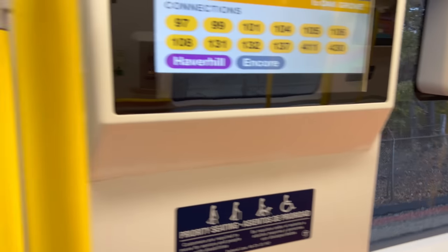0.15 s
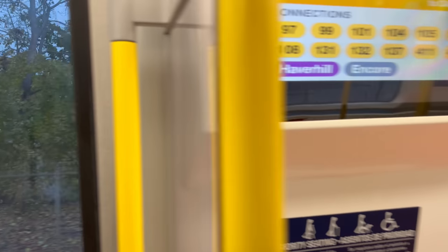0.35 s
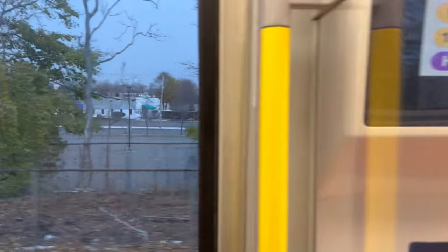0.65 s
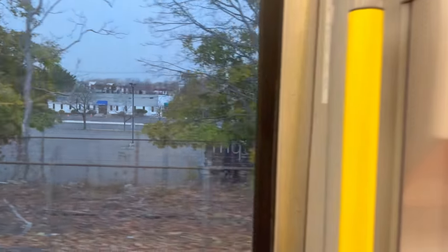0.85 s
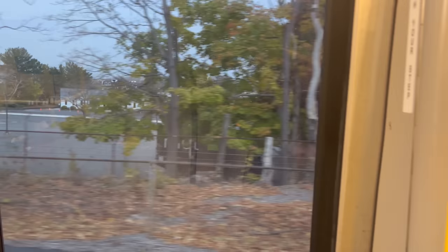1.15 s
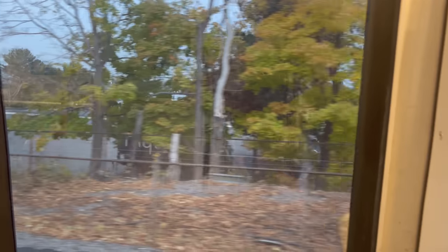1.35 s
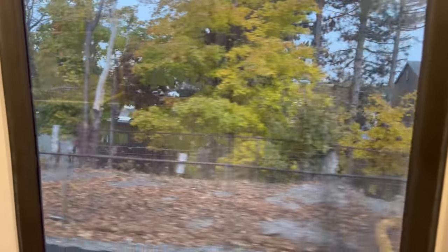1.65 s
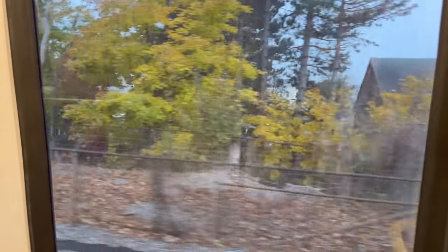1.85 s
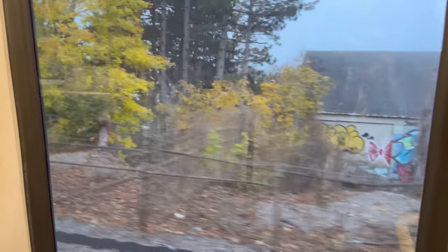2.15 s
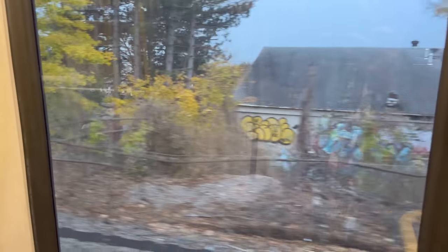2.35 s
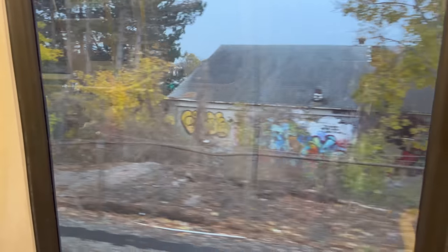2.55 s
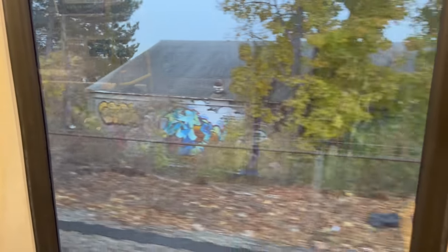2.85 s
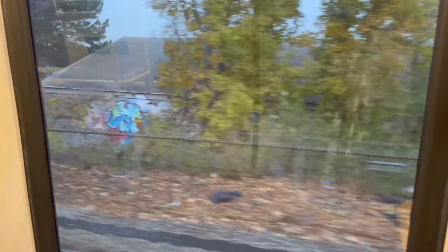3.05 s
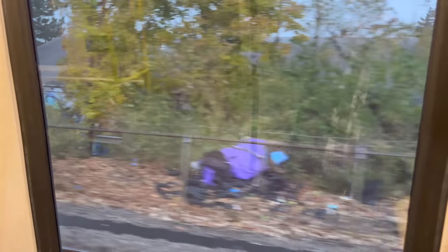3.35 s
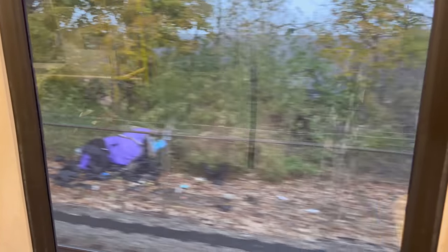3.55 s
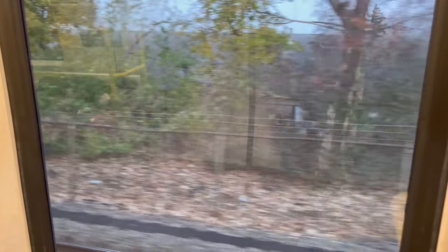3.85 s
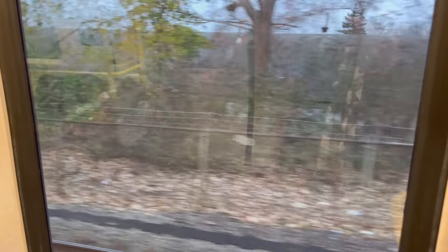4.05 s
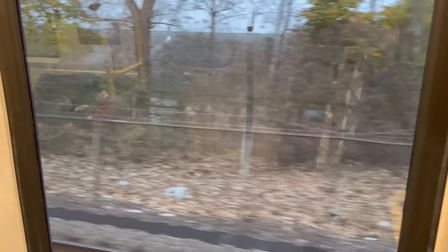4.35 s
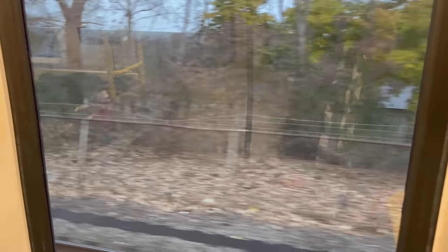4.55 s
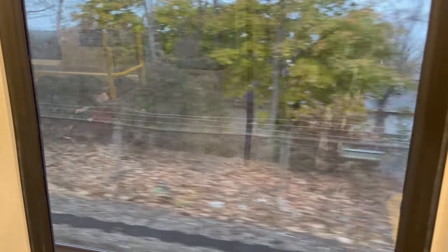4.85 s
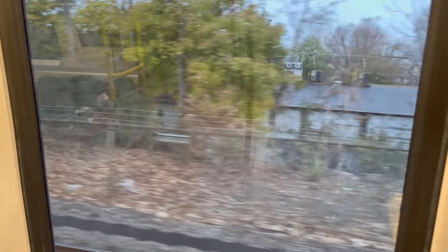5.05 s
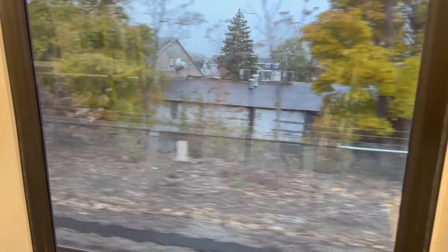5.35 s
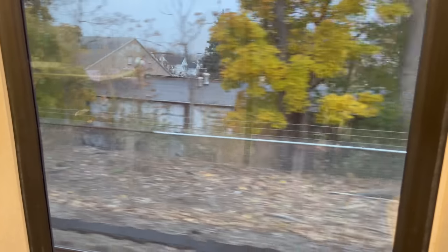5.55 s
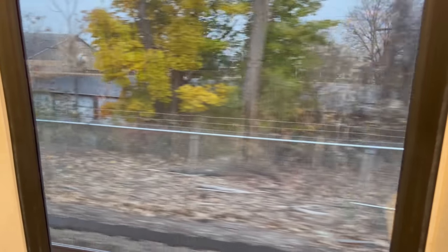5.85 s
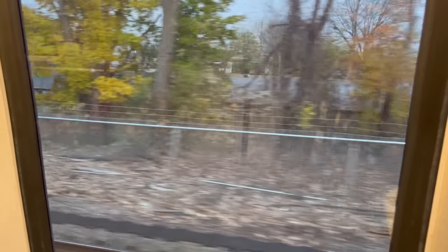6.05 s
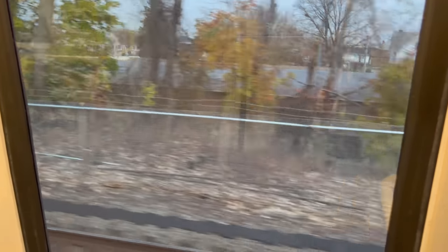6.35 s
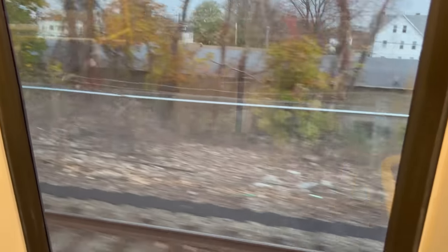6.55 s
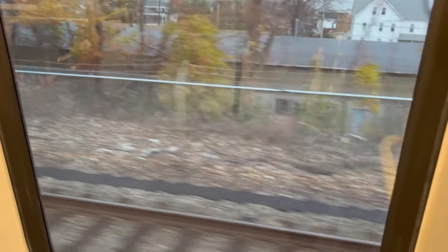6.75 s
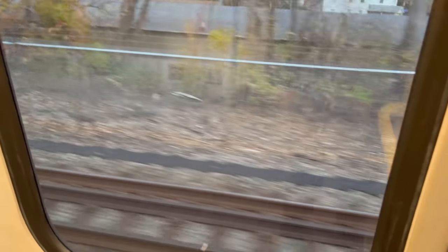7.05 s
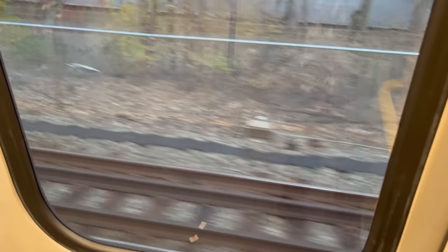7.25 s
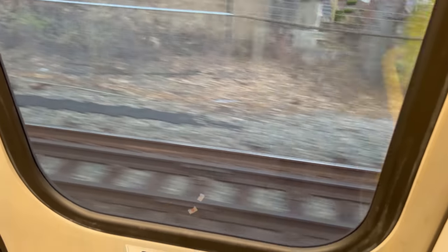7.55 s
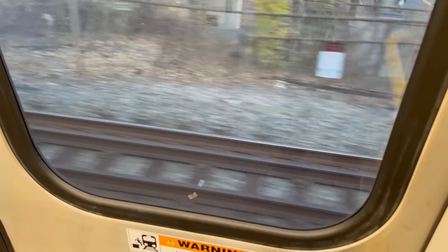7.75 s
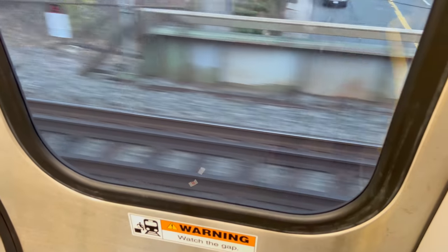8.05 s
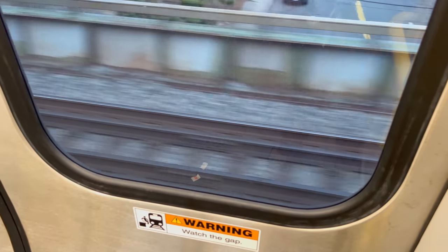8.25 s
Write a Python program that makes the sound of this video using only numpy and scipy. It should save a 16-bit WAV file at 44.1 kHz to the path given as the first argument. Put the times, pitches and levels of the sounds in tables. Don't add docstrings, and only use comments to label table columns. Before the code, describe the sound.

Low rumble and boom inside a moving metro carriage, with soft rattles, one handling knock early on, and a louder drumming swell at the end.

```python
import sys
import numpy as np
from scipy import signal
from scipy.fft import rfft, irfft, next_fast_len
from scipy.io import wavfile
from scipy.ndimage import uniform_filter1d

SR = 44100
rng = np.random.default_rng(int(sys.argv[2]) if len(sys.argv) > 2 else 0)


def dump_mix(stems):
    frames = np.atleast_2d(stems).T
    limited = np.clip(frames, -1, 1)
    pcm = np.round(limited * 32767).astype(np.int16)
    wavfile.write(sys.argv[1], SR, pcm)


def makeup_ratio(level_db):
    decades = np.asarray(level_db, float) / 20
    return 10 ** decades


N = 370881
T = np.arange(N) / SR
SIZE = next_fast_len(N)
HZ = np.maximum(np.arange(SIZE // 2 + 1) * SR / SIZE, 1)


def curve(table, k=1):
    times, values = np.array(table)[:, [0, k]].T
    return np.interp(T, times, values)


def over_hz(table, k=1):
    table = np.array(table)
    return np.interp(np.log(HZ), np.log(table[:, 0]), table[:, k])


def mode(hz, width):
    return 1 / (1 + ((HZ ** 2 - hz ** 2) / (HZ * width)) ** 2)


def resonances(table):
    return 1 + sum((makeup_ratio(db) - 1) * mode(hz, width) for hz, width, db in table)


def walk(rate):
    knots = rng.standard_normal(1000)
    knots = knots - uniform_filter1d(knots, size=5)
    joined = np.interp(T * rate, np.arange(len(knots)), knots)
    return 1.18 * uniform_filter1d(joined, int(SR / rate / 2))


def spans(table, ramp_s):
    ramp = int(ramp_s * SR)
    return sum(makeup_ratio(db) * uniform_filter1d(1. * ((T > a) & (T < b)), size=ramp) for a, b, db in table)


def panned(wave, pan_db):
    return wave * makeup_ratio(np.array([[pan_db], [-pan_db]]) / 2)


def tone(hz, db, wobble_hz, rate, pan_db):
    phase = 2 * np.pi * np.cumsum(hz + wobble_hz * walk(rate)) / SR
    return panned(np.sqrt(2) * makeup_ratio(db) * np.sin(phase), pan_db)


def rings(table, swell_s, lift_db, pan_db):
    out = np.zeros(N)
    for (s, db, hz), start in zip(table, rng.random(len(table))):
        near = slice(max(int((s - 4 * swell_s) * SR), 0), int((s + 4 * swell_s) * SR))
        t = T[near] - s
        swell = np.exp(-(t / swell_s) ** 2 / 2)
        out[near] += makeup_ratio(db + lift_db) * swell * np.sin(2 * np.pi * (hz * t + start))
    return panned(np.sqrt(2) * out, pan_db)


def scrapes(rows):
    out = np.zeros((2, N + SR))
    t = T[:SR]
    like = .35
    for s, db, hz, width, t60 in rows:
        rise_s = .055 * t60
        shape = (1 - np.exp(-t / rise_s)) * makeup_ratio(-60 * t / t60)
        grit = rng.standard_normal((2, len(t)))
        grit[1] = like * grit[0] + np.sqrt(1 - like ** 2) * grit[1]
        b, a = signal.iirpeak(hz, hz / width, fs=SR)
        scrape = shape * signal.lfilter(b, a, signal.lfilter(b, a, grit))
        power = np.mean(scrape ** 2, axis=1, keepdims=True)
        scrape *= np.sqrt(np.mean(shape ** 2) / power) / shape.max()
        i = int(s * SR)
        out[:, i:i + len(t)] += makeup_ratio(db) * scrape
    return out[:, :N]


# (frequency [Hz], likeness [0-1], right leads [rad], left minus right [dB])
MICROPHONES = [(60, 0.98, 0.2, -1.5), (110, 0.93, 0.02, -0.5), (184, 0.93, 0, -1.2), (260, 0.83, 0, -2.5),
               (370, 0.64, -0.1, -2.5), (452, 0.53, -1.64, -3), (517, 0.3, -2.5, 1), (600, 0.32, -2, 2.5),
               (690, 0.36, -.7, 3), (800, 0.27, -1.3, 3.5), (937, 0.52, -1.3, 0.5), (1160, 0.2, -2, 0.5),
               (1600, 0.34, -3.5, 0), (1890, 0.3, -4, -1.5), (2320, 0.3, -3.5, -2.5), (2670, .05, -3.5, -1),
               (3180, 0.1, -8.5, -2), (3550, 0, -10, 0), (4070, 0.3, -11, -1.5), (4700, 0, -12, 1),
               (5000, 0.2, -14, .5), (6300, 0.15, -18, 1.5), (7000, 0.1, -20, 3.5), (8850, 0.08, -20.5, 5),
               (11000, 0.4, -25, -0.5)]


def field():
    a, b = rfft(rng.standard_normal((2, SIZE)))
    like = np.clip(over_hz(MICROPHONES), 0, 1)
    lead, tilt = over_hz(MICROPHONES, k=2), over_hz(MICROPHONES, k=3)
    right = like * a * np.exp(1j * lead) + np.sqrt(1 - like ** 2) * b
    return np.array([a * makeup_ratio(tilt / 2), right * makeup_ratio(-tilt / 2)])


def level_one(x):
    return x / np.sqrt(np.mean(x.mean(axis=0) ** 2))


def flutter(spectrum, lo_hz, hi_hz, shared_db, own_db, rate):
    bands = 0
    for centre in np.arange(np.log2(lo_hz) + .25, np.log2(hi_hz), .5):
        mask = np.cos(np.pi * np.clip(np.log2(HZ) - centre, -.5, .5)) ** 2
        bands = bands + irfft(spectrum * mask, SIZE)[:, :N] * makeup_ratio(own_db * walk(rate))
    return level_one(bands * makeup_ratio(shared_db))


# (time [s], lift [dB], part struck [Hz])
JOLTS = [(.05, -1, 150), (.17, 0.5, 190), (0.188, -5.5, 486), (.3, 5, 358.6), (0.398, 2, 260),
         (1.138, 2.5, 345.6), (1.29, 4.5, 680), (.66, 3, 110), (1.348, 3, 136), (2.08, 2.5, 150.1),
         (2.5, 0.5, 677), (7.15, 3, 280), (2, -2.5, 710), (2.58, -7, 322), (2.63, 1, 150),
         (3.01, -1.5, 690), (3.3, 0, 340), (3.37, -2, 340), (3.43, 3.5, 685), (3.54, 1, 600),
         (1.05, 2.5, 270), (6.62, -2.5, 370), (6.79, -3.5, 400), (3.83, -1, 340), (4.45, -3, 318.6),
         (4.52, 0.5, 310), (4.88, 1, 399.2), (5.28, 5, 600), (5.5, -4, 318), (6.578, -2, 380),
         (6.66, -3, 400), (6.74, -1, 370), (6.7, 1, 800), (5.68, -2, 280), (5.76, -4, 260),
         (.12, -4.5, 200), (6.72, 2, 760), (7.2, 1, 270), (8.38, -4.5, 280), (8.3, 1, 270),
         (6.84, 1.5, 640), (7, 1, 151), (7.45, 3.5, 182.5), (7.64, 6, 160), (7.8, 4.5, 200),
         (7.95, 5.5, 350)]


def jolted(hz):
    jolt_s, spread_octaves = 0.02, 0.6
    lift = 0
    for s, db, struck_hz in JOLTS:
        distance = np.log2(hz / struck_hz) / spread_octaves
        lift = lift + db * np.exp(-((T - s) / jolt_s) ** 2 / 2 - distance ** 2 / 2)
    return lift


# (frequency [Hz], level [dB per Hz])
RAIL = [(12, -68.5), (20, -38.5), (27, -25), (39, -3), (60, -5), (107, -6), (174, -3), (245, -10.5),
        (352, -6.5), (620, -16), (700, -15.5), (1210, -25), (2500, -38.5), (3250, -70), (5500, -120)]
# (frequency [Hz], width [Hz], lift [dB])
BODY = [(40, 12, -6), (78, 39, 7), (91, 11, 2), (118, 8.7, 2.5), (138, 17, 5), (174.5, 28, 3.5),
        (217, 20, 3), (270, 11, 5.5), (303.6, 15, 5), (350, 31, 4), (400, 44, 1), (581, 64, 3),
        (701, 43, 3.5), (1097, 73, 3), (1390, 150, 3)]
# (time [s], roughness [dB], lean to floor + or doors - [dB])
TRACK = [(0, -0.5, -1), (.15, -3, 0.5), (.4, -1, 0.5), (.6, -3.5, -2), (1.1, -1.5, 1), (1.5, -0.5, 0),
         (2.2, -0.5, 1.5), (2.9, 1, 0.5), (3.5, -0.5, 0.5), (4, -1, -0.5), (4.8, 0, -0.5), (5.6, -0.5, 1),
         (6.2, 0.5, 1), (6.6, 0.5, -1), (7.3, -0.5, 2), (7.9, 1.5, 0.5), (8.05, 3.5, 0.5), (8.41, 1, -6.5)]


def rolling():
    sway = 4.6 * mode(24, 12)
    shaken = field() * makeup_ratio(over_hz(RAIL) + sway) * resonances(BODY)
    turn = 2 * np.pi * np.cumsum(7.6 + 0.18 * walk(1.476)) / SR
    beat_db = 1.55 * np.sin(turn + 1.22) + 0.84 * np.sin(2 * turn + 3.14)
    rough, track, lean = walk(9), curve(TRACK), curve(TRACK, k=2)

    under = makeup_ratio(-30.5) * flutter(shaken, 30.4, 80, .6 * rough, .6, 2.3)
    floor_gain = makeup_ratio(-23.5 + track + lean + jolted(160))
    floor = floor_gain * flutter(shaken, 85.3, 226, 0.13 * rough, 0.89, 5.6)
    doors_gain = makeup_ratio(-23.5 + track - lean + jolted(330))
    doors = doors_gain * flutter(shaken, 226.8, 452, 0.31 * rough, 0.94, 5.5)
    wheels_gain = makeup_ratio(-28 + 0.72 * track + jolted(680))
    wheels = wheels_gain * flutter(shaken, 445.0, 890, 0.72 * rough + beat_db, 0.93, 7.2)
    treads_gain = makeup_ratio(-37.5 + 0.42 * track)
    treads = treads_gain * flutter(shaken, 884.0, 1810, 0.5 * rough + 0.62 * beat_db, 1.0, 9)
    return under + floor + doors + wheels + treads


# (time [s], level [dB], note [Hz])
SWELLS = [(0.331, -34, 280), (0.36, -23, 247), (0.403, -23, 316), (0.43, -23, 188), (1.144, -18, 330),
          (1.335, -24, 160), (1.541, -21.5, 381), (2.081, -17, 106), (2.29, -24.5, 291),
          (2.366, -22.5, 197), (2.627, -21, 166), (2.818, -24, 333), (2.894, -19, 173), (2.929, -22.5, 412),
          (2.929, -15, 157.9), (3.019, -24, 452), (3.135, -26, 386), (3.28, -25, 430), (3.312, -20.5, 388),
          (3.474, -32, 242), (3.553, -27, 430), (3.596, -20, 107), (3.738, -23, 276), (3.808, -16.5, 354),
          (3.878, -24, 290), (3.994, -28, 247), (4.278, -18, 162), (4.29, -21, 387), (4.38, -26, 400),
          (4.519, -26, 250), (4.519, -18.5, 365), (4.624, -28, 405), (4.632, -28, 277), (4.876, -23, 400),
          (4.894, -28, 328), (5.161, -19.5, 150), (5.663, -20.5, 193), (5.857, -24.5, 280),
          (6.182, -20, 161), (6.351, -21.5, 275), (6.626, -18.5, 178), (6.789, -24, 212), (7.14, -24, 221),
          (7.169, -25, 230), (7.198, -22, 268), (7.256, -22, 202), (7.451, -26, 118), (7.454, -28, 294),
          (7.544, -24, 122), (7.561, -18, 150), (7.616, -17, 149), (7.642, -33, 204), (7.726, -20.5, 287),
          (7.753, -18, 145), (7.787, -26, 145), (7.811, -15.5, 266), (7.822, -29, 344), (7.831, -27, 140),
          (7.86, -23.5, 217), (7.892, -23, 430)]
# (time [s], level [dB], panel note [Hz])
LURCH = [
    (.29, -27, 167),
    (.3, -31, 326),
    (.33, -23, 150),
    (.37, -29, 343),
    (.385, -23, 174),
    (.42, -26, 290),
    (1.92, -27, 282),
    (1.97, -32, 265),
    (.56, -25, 270),
    (.66, -26, 257),
]


def swells():
    swell_s = .017
    return rings(SWELLS, swell_s, -2, -1.6) + rings(LURCH, swell_s, 0, -1.6)


# (time [s], level [dB], note [Hz])
PINGS = [(1.146, -32, 870), (1.843, -35, 796), (1.852, -27, 746), (1.866, -35, 900), (2.485, -28, 556),
         (2.514, -24, 667), (3.024, -28, 710), (3.425, -26, 662), (3.532, -21.5, 725), (3.666, -36, 944),
         (3.939, -28, 602), (4.136, -32, 920), (4.362, -28, 825), (4.78, -29, 500), (4.882, -34, 861),
         (4.899, -24, 581), (5.283, -38, 985), (5.291, -28, 565), (5.991, -36, 968), (6.351, -25.5, 549),
         (6.565, -34, 980), (6.766, -28, 845), (6.853, -27, 484), (7.361, -32, 775), (7.367, -27, 613),
         (7.506, -30, 990), (7.695, -24, 610), (7.808, -26, 619), (7.906, -23, 665), (7.921, -28, 810),
         (8.04, -33, 619), (8.04, -24.5, 800), (8.069, -26, 624), (8.153, -35, 602), (8.202, -32, 820),
         (8.205, -26, 624), (8.304, -24.5, 756), (8.307, -28, 495), (8.307, -26, 655), (8.316, -36, 940)]


def pings():
    return rings(PINGS, 0.0075, 0, 1.5)


# (time [s], level [dB], note [Hz])
RATTLE = [(.128, -34, 725), (.205, -27, 720), (.225, -28, 725), (.21, -37, 1050), (.265, -40, 1110),
          (.272, -27, 624), (.3, -31, 730), (.308, -32, 1030), (.308, -34, 1150), (.32, -30, 885),
          (.35, -28, 690), (.352, -33, 930), (.392, -36, 600), (.505, -33, 745), (1.271, -29, 690),
          (1.95, -36, 700), (2.622, -26, 690), (3.916, -34, 700), (5.582, -33, 700), (6.066, -38, 700),
          (6.697, -31, 760)]


def rattle():
    return rings(RATTLE, 0.0064, 0, 1.5)


# (time [s], level [dB], note [Hz])
GROAN = [
    (.54, -27, 105),
    (.63, -25, 99),
    (.71, -27.5, 109),
]


def groan():
    return rings(GROAN, 0.028, 0, -1.1)


# (frequency [Hz], width [Hz], level [dB])
GIRDERS = [(138.5, 16, 6), (170, 40, -2.5), (285, 30, -2.5), (325, 30, 4), (358, 29, -1.5), (430, 39, -11),
           (640, 140, -10.5)]
# (time [s], level [dB])
BRIDGE = [
    (7.3, -49),
    (7.6, -35),
    (7.75, -37),
    (7.97, -28),
    (8.03, -11),
    (8.2, -12),
    (8.35, -2.5),
    (8.385, -28),
    (8.405, -6),
]


def bridge():
    ring = np.sqrt(sum(makeup_ratio(db) ** 2 * mode(hz, width) ** 2 for hz, width, db in GIRDERS))
    drumming = level_one(irfft(field() * ring, SIZE)[:, :N])
    return drumming * makeup_ratio(curve(BRIDGE) - 13) * (T > BRIDGE[0][0])


# (time [s], level [dB], girder note [Hz])
THUMPS = [(7.95, -24, 292), (7.95, -23, 350), (7.975, -32, 327), (8.017, -14.5, 168), (8.028, -20.5, 430),
          (8.025, -16.5, 334), (8.05, -15, 322), (8.068, -17, 160), (8.095, -15, 144), (8.082, -16, 344),
          (8.083, -23, 412), (8.098, -18, 204), (8.11, -10.5, 315), (8.133, -19, 228), (8.135, -17, 150),
          (8.144, -12, 360), (8.17, -25, 201), (8.18, -16, 305), (8.202, -13.5, 162), (8.214, -15, 352),
          (8.228, -18, 299), (8.243, -21, 390), (8.252, -18, 177), (8.276, -19, 346), (8.3, -18, 354),
          (8.29, -27, 290), (8.308, -21, 149), (8.324, -27, 254), (8.325, -19, 345), (8.348, -21, 452),
          (8.348, -10.5, 336), (8.353, -13, 156), (8.372, -24, 310), (8.406, -11, 362), (8.39, -23.5, 200),
          (8.04, -20, 345), (8.235, -21, 165)]


def thumps():
    return rings(THUMPS, 0.01, 0.5, -2.5)


# (time [s], detune [Hz], level [dB])
HUM = [(0, 0, -38), (.4, -0.5, -24), (.75, -0.5, -25), (.92, 0, -40), (1.15, 0, -27), (2.3, -0.5, -25.5),
       (2.42, -0.5, -40), (2.6, 0, -23.5), (3.15, 0, -28.5), (3.42, 0, -23), (4.2, 0, -27.5),
       (5.3, -1, -25.5), (5.65, -3, -36), (5.85, -1, -25), (6.8, -1, -31), (7.1, -2.5, -28.5),
       (7.6, 0, -24), (8.41, 1.5, -32)]
# (start [s], end [s], level [dB])
BEAT = [
    (0, .6, -27.5),
    (.85, 1.25, -28.5),
    (1.6, 1.85, -43),
    (2.15, 2.9, -34),
    (3.2, 4.1, -35),
    (4.3, 5.2, -33),
    (6, 6.6, -30),
    (6.7, 7.35, -27),
    (7.85, 8.41, -27),
]
# (time [s], lift [dB])
SURGES = [(.28, 0.5), (.41, 0), (1.03, 7), (1.17, 4), (1.66, -1), (2.3, 8), (2.93, -7), (3.37, 5),
          (4.31, -1), (4.47, 2), (4.76, 1), (4.89, 0), (5.03, 2), (6.15, 6), (6.22, -10), (6.4, 10),
          (6.85, 7), (7.08, 6), (7.79, -7), (8.13, 5), (8.18, -10), (8.28, 2)]


def boom():
    surge_s = 0.025
    surge_db = sum(db * np.exp(-((T - s) / surge_s) ** 2 / 2) for s, db in SURGES)
    hum = tone(58.5 + curve(HUM), curve(HUM, k=2) + 1.0 * walk(6.5), 0.65, 7.4, -.9)
    beat = spans(BEAT, 0.11) * tone(66.2, 1.2 * walk(5), 1.46, 6, -.9)
    return makeup_ratio(surge_db) * (hum + beat)


# (delay [s], level [dB], centre [Hz], width [Hz], 60 dB fade [s])
KNOCK = [(.0015, -47.5, 9000, 11000, .025), (.001, -44, 12000, 2200, .04), (.003, -38, 6000, 1300, 0.05),
         (0.0018, -44.5, 5700, 7000, 0.27), (0.0081, -37, 3680, 550, 0.13), (.1, -44, 2000, 1200, .3),
         (.19, -45, 3000, 2500, .2), (.005, -49, 8600, 1800, 0.32), (.0012, -40, 6000, 9000, .015),
         (.001, -57.5, 15300, 1500, .1), (0.011, -38.5, 4300, 2300, .3), (.012, -53.5, 12500, 6000, 0.18),
         (.04, -38.5, 2000, 2700, .9)]
# (level [dB], centre [Hz], width [Hz], 60 dB fade [s])
BRUSH = (-42, 3600, 3600, 0.25)


def hand():
    knock_s, brush_s = .547, 1.515
    knock = [(knock_s + delay, *rest) for delay, *rest in KNOCK]
    return scrapes(knock + [(brush_s, *BRUSH)])


# (frequency [Hz], level [dB], 60 dB fade [s])
SHELL = [(3900, -34, 0.016), (4850, -36, .02), (5540, -34.5, .03), (6050, -26, 0.018), (6350, -31, .015),
         (7200, -39, 0.022), (8600, -43, .02), (10200, -49, .015), (11700, -47, .015), (12500, -46, .02),
         (14300, -53, .015)]


def shell():
    t = np.maximum(T - .5484, 0)
    tap = sum(makeup_ratio(db - 60 * t / t60) * np.sin(2 * np.pi * hz * t) for hz, db, t60 in SHELL)
    return panned(np.sqrt(2) * tap * (1 - np.exp(-t / 0.00089)), -2.4)


# (time [s], level [dB], centre [Hz], 60 dB fade [s])
TICKS = [(.33, -74, 11900, 1.3), (1.08, -62, 9500, 1.6), (1.39, -60, 13100, .08), (1.485, -63, 12700, .3),
         (1.527, -61.5, 11500, .14), (1.885, -62, 11900, 0.14), (2.21, -69, 13000, .15),
         (2.32, -69, 12900, .15), (2.98, -70, 11000, 0.17), (3.5, -66, 11000, 0.25), (4.68, -63, 8000, .3),
         (4.89, -67, 11900, 0.09), (5.555, -63, 11900, 0.11), (6.42, -69, 13100, .15),
         (7.96, -67, 12100, 0.12)]


def ticks():
    width_hz = 6500
    return scrapes([(s, db, hz, width_hz, t60) for s, db, hz, t60 in TICKS])


# (frequency [Hz], level [dB per Hz])
VENT = [(900, -42), (1500, 1.5), (2300, -2), (3800, -8), (6400, -11.5), (7000, -16), (7700, -26.5),
        (8050, -19.5), (10500, -32), (12550, -36.5), (12900, -37.5), (14900, -39.5), (15150, -44),
        (15700, -46)]
# (frequency [Hz], width [Hz], lift [dB])
DUCT = [(2820, 410, -1), (4470, 280, 0.5), (5330, 280, -3), (5600, 350, 1)]
# (time [s], level [dB])
GUST = [(0, -41.5), (.5, -40.5), (.9, -42.5), (1.8, -41.5), (2.15, -42.5), (2.6, -42.5), (3.1, -41.5),
        (3.35, -42), (3.55, -42), (4.5, -42.5), (4.78, -41.5), (5.45, -42.5), (5.7, -42), (6.2, -42),
        (7.15, -42.5), (7.9, -41.5), (8.41, -43)]


def vents():
    air = field() * makeup_ratio(over_hz(VENT)) * resonances(DUCT) * (HZ > VENT[0][0])
    return makeup_ratio(curve(GUST)) * flutter(air, 920, 20480, 0.51 * walk(9), 0.71, 9)


# (start [s], end [s], level [dB])
LOADED = [
    (.25, 1.1, -54),
    (1.5, 3.7, -50.5),
    (3.86, 4.45, -48),
    (4.6, 6.75, -49.5),
    (6.9, 7.55, -47),
]


def whine():
    return spans(LOADED, 0.069) * tone(1364, 2.0 * walk(10), 2.7, 13, 5.6)


# (start [s], end [s], level [dB])
WHISTLE = [
    (3.62, 3.65, -80),
    (4.0, 4.05, -77),
    (4.07, 4.12, -76),
    (4.3, 4.35, -76),
    (4.39, 4.45, -77),
    (5.57, 5.65, -77),
    (5.7, 5.74, -78),
    (5.79, 5.84, -78),
]


def whistle():
    return spans(WHISTLE, .009) * tone(14495, 4 * walk(25), 8, 30, -6)


def scene():
    wheels_and_body = rolling() + swells() + pings() + rattle() + groan()
    crossing = bridge() + thumps()
    close_by = hand() + shell() + ticks()
    background = vents() + whine() + whistle()
    return wheels_and_body + crossing + boom() + close_by + background


def top_cut(x):
    return signal.sosfilt(signal.butter(12, 15710, fs=SR, output="sos"), x)


def record(dry):
    top = 1.02
    rounded = dry / (1 + np.abs(dry / top) ** 4) ** .25
    side = (rounded[0] - rounded[1]) / 2
    lowpass = signal.ellip(10, .2, 40, 15100, fs=SR, output="sos")
    lost = side - signal.sosfiltfilt(lowpass, side)
    mix = rounded - lost * np.array([[1], [-1]])
    return top_cut(mix)


dry = scene()
out = record(dry)
dump_mix(out)
```